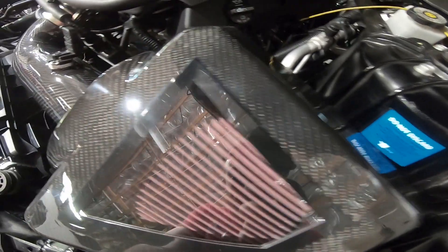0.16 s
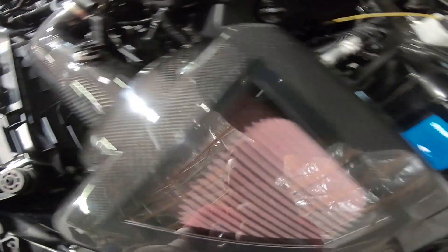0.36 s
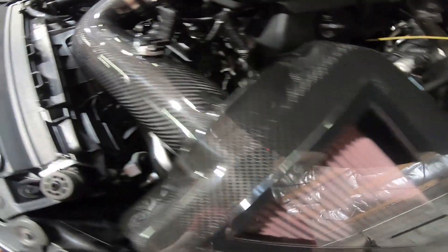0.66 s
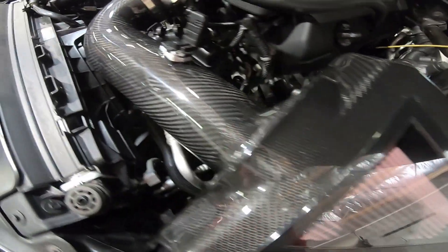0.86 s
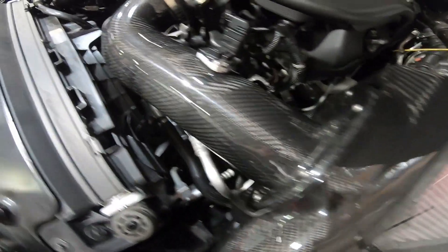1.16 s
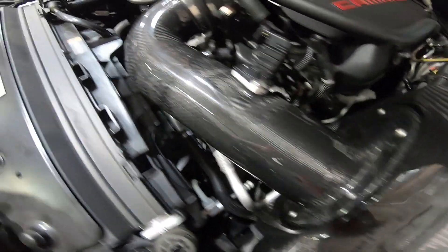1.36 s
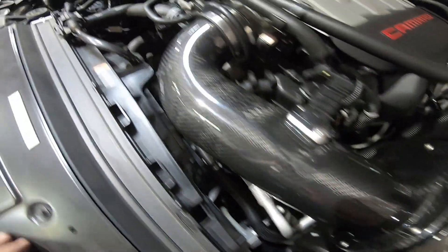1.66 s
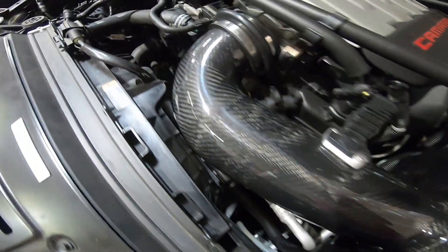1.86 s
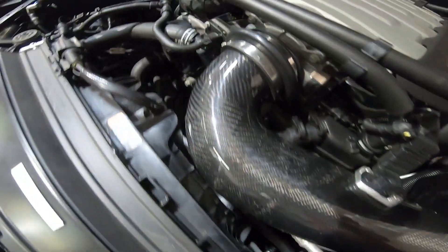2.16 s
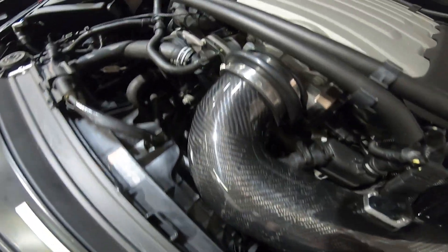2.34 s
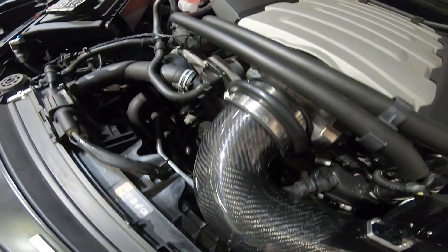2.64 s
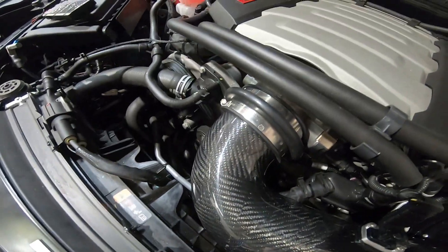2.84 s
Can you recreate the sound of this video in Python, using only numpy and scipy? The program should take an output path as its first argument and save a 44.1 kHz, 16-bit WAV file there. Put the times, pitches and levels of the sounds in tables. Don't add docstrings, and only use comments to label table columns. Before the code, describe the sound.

A large eight-cylinder engine idles without revving, heard close over the open bay in a garage: deep steady drone, rough low rumble, hissing valve ticks and small repeating pings, with one soft handling knock early on.

```python
import sys
import numpy as np
from scipy import signal
from scipy.fft import rfft, irfft
from scipy.io import wavfile

SR = 44100
rng = np.random.default_rng(int(sys.argv[2]) if len(sys.argv) > 2 else 0)


def int16_out(signal):
    q = np.round(np.clip(np.atleast_2d(signal).T, -1, 1) * 32767)
    wavfile.write(sys.argv[1], SR, q.astype(np.int16))


def volts_from_db(level):
    exponent = np.asarray(level, float) / 20
    return 10 ** exponent


N = 132300

# (time [s], firing rate [Hz], drone level [dB])
FIRING = [(0.0, 39.49, -17.5), (0.375, 39.92, -17.9), (0.75, 39.84, -18.0), (1.125, 40.21, -18.0),
          (1.5, 40.08, -17.6), (1.875, 40.01, -16.7), (2.25, 40.28, -17.6), (2.625, 40.22, -18.2),
          (3.0, 40.46, -18.2)]
# (time [s], travel [0 = over air box, 1 = over engine], drone octave level [dB])
CAMERA = [(0, 0.13, -21), (.4, 0.15, -25), (.8, 0.45, -25), (1.2, 0.69, -23.5), (1.6, 0.83, -24.5),
          (1.9, 1, -24), (2.3, 1, -23.5), (2.6, 1, -25), (3, 1, -23.5)]


def evened(x):
    return x / np.sqrt(np.mean(x ** 2) + 1e-20)


def column(table, index):
    rows = np.array(table)
    return np.interp(np.arange(N) / SR, rows[:, 0], rows[:, index])


def read(table, hz, index=1):
    rows = np.array(table)
    return np.interp(np.log(hz + 1), np.log(rows[:, 0] + 1), rows[:, index])


def air(gain):
    hz = np.fft.rfftfreq(N, 1 / SR)
    return evened(irfft(rfft(rng.standard_normal((2, N))) * gain(hz), N))


def resonance(hz, mid_hz, width_hz):
    return 1 / (1 + (2 * (hz - mid_hz) / width_hz) ** 2)


def per_firing(turns):
    return np.interp(turns, np.arange(200), rng.standard_normal(200))


def drone(turns):
    # (time [s], pitch [Hz], level [dB])
    mains = [(0.0, 119.13, -27.5), (0.375, 120.14, -27.8), (0.75, 119.87, -27.5), (1.125, 119.92, -26.6),
             (1.5, 120.04, -26.7), (1.875, 119.91, -26.6), (2.25, 119.88, -24.7), (2.625, 120.04, -25.9),
             (3.0, 119.45, -27.1)]
    uneven_db, uneven_turns = .35, .006
    octave_turn, hum_turn = .13, -.32

    first_amp = volts_from_db(column(FIRING, index=2) + uneven_db * per_firing(turns))
    first_turns = turns + uneven_turns * per_firing(turns)
    first = first_amp * np.cos(2 * np.pi * first_turns)

    second_amp = volts_from_db(column(CAMERA, index=2) + 2 * uneven_db * per_firing(turns))
    second_turns = 2 * turns + octave_turn + 2 * uneven_turns * per_firing(turns)
    second = second_amp * np.cos(2 * np.pi * second_turns)

    hum_turns = np.cumsum(column(mains, index=1)) / SR + hum_turn
    hum = volts_from_db(column(mains, index=2)) * np.cos(2 * np.pi * hum_turns)
    return np.sqrt(2) * (first + second + hum)


def rumble(travel):
    # (frequency [Hz], density [dB per Hz])
    colour = [(15, -7), (50, -1), (100, 3.5), (140, -1.5), (175, -6), (260, -11.5), (400, -16), (600, -24)]
    level_db, travel_db = -28.5, -1
    noise = air(lambda hz: volts_from_db(read(colour, hz)) / (1 + (hz / 700) ** 4))
    return volts_from_db(level_db + travel_db * travel) * noise


def whirr(travel):
    # (frequency [Hz], density [dB per Hz])
    colour = [(300, -10.5), (450, -3), (800, -1), (1130, -7.5), (1740, -12.5), (3010, -15.5), (4670, -26),
              (7000, -49)]
    level_db, travel_db = -42, 3.5
    noise = air(lambda hz: volts_from_db(read(colour, hz)) * (hz > 200) * (hz < 9000))
    return volts_from_db(level_db + travel_db * travel) * noise


def pump_whine():
    # (time [s], swell [dB])
    swell = [(0, -6), (.55, -6), (.68, 11), (.85, -7), (1.0, 16.5), (1.25, 9), (1.4, -3), (2.2, 5),
             (3, 12.5)]
    mid_hz, width_hz, level_db = 2950, 10, -70
    return volts_from_db(level_db + column(swell, index=1)) * air(lambda hz: resonance(hz, mid_hz, width_hz))


def lumps(per_s):
    hz = np.fft.rfftfreq(N, 1 / SR)
    return evened(irfft(rfft(rng.standard_normal(N)) / (1 + (hz / per_s) ** 4) * (hz > .5), N))


def cavities(table, nearness, lump_db, lumps_per_s):
    out = np.zeros((2, N))
    for mid_hz, width_hz, db, nearness_db in table:
        level_db = db + nearness_db * nearness + lump_db * lumps(lumps_per_s)
        out += volts_from_db(level_db) * air(lambda hz: resonance(hz, mid_hz, width_hz))
    return out


def panels():
    # (frequency [Hz], width [Hz], level [dB], change from far to near [dB])
    booms = [(208.5, 30.5, -44.5, 11), (252, 38, -51, 10.5), (299, 26, -45, 8), (337, 54, -51, 4.5)]
    # (time [s], nearness [0 = far, 1 = near])
    nearness = [(0, .3), (.5, 0.12), (.85, 0.55), (1.15, 0.39), (1.4, 0.79), (1.65, 0.77), (1.9, 1.25),
                (2.1, 1.15), (2.35, 1.26), (2.5, 0.92), (2.6, 1.26), (2.72, 0.63), (3, 0.59)]
    return cavities(booms, column(nearness, index=1), lump_db=1.5, lumps_per_s=14)


def air_box(travel):
    # (frequency [Hz], width [Hz], level [dB], change over the travel [dB])
    hollows = [(491, 136, -39.5, -35), (621, 210, -50, -20.5), (1775, 230, -53, -1.5),
               (429.4, 24, -49, -1.5), (620, 22, -54, 4.5), (1011, 34, -63, 9.5), (1330, 95, -62, 2),
               (2170, 330, -60, 3.5)]
    return cavities(hollows, travel, lump_db=2, lumps_per_s=20)


def valves(turns, travel):
    # (frequency [Hz], density [dB per Hz])
    hiss = [(3000, -19), (4700, -9.5), (6200, -2), (7000, -2), (7900, -3.5), (8700, -12), (10800, -18.5),
            (15800, -25.5)]
    # (place [firings], level over steady hiss [dB])
    puffs = [(.55, -9.5), (1.52, 4.5), (2.5, -2), (3.5, 2.5), (3.85, -1), (4.55, 1), (5.55, 3), (6.52, 5),
             (7.45, 2.5)]
    # (from [Hz], to [Hz], share of the puffs [0-1])
    gear = [(2000, 5200, .6), (5200, 6000, .9), (6000, 6700, 1), (6700, 7400, .9), (7400, 8300, 1),
            (8300, 9400, .6), (9400, 11000, .6), (11000, 17000, .4)]
    hiss_db, travel_db = -51, 3
    rise_firings, fall_firings, spread_db = .1, .3, 3.2
    ticks_per_s, tick_db, tick_spread_db = 360, -14, 1

    share = np.clip(np.array(gear)[:, 2:], 0, 2)
    power = np.ones((len(gear), N))
    for place, db in puffs:
        since = (turns - place) % 8
        cycle = ((turns - place) // 8 + 1).astype(int)
        shape = (1 - np.exp(-since / rise_firings)) * np.exp(-since / fall_firings)
        luck = np.sqrt(3) * rng.uniform(-0.91, 1, (len(gear), 20))
        size = share * volts_from_db(2 * (db + spread_db * luck))
        power += 2 * shape * size[:, cycle]

    tick_size = volts_from_db(tick_spread_db * np.minimum(rng.exponential(1, N), 4))
    ticks = (rng.random(N) < ticks_per_s / SR) * tick_size
    drive = rng.standard_normal((2, N)) + volts_from_db(tick_db) * evened(ticks - ticks.mean())

    hz = np.fft.rfftfreq(N, 1 / SR)
    spectrum = 0
    for part_power, (lo_hz, hi_hz, _) in zip(power, gear):
        spectrum = spectrum + rfft(drive * np.sqrt(part_power)) * (hz >= lo_hz) * (hz < hi_hz)
    return volts_from_db(hiss_db + travel_db * travel) * evened(irfft(spectrum * volts_from_db(read(hiss, hz)), N))


def pings(turns, travel):
    # (place [firings], frequency [Hz], t60 [s], level [dB], change over the travel [dB])
    parts = [
        (.75, 782, .12, -32.5, 0),
        (7.3, 662, .17, -27, -24),
        (4.7, 775, .09, -42, 0),
        (6.1, 615, .14, -32, -22),
        (4.4, 530, .09, -32, -18),
        (3.2, 735, .09, -46, 8),
    ]
    # (time [s], level [dB])
    facing = [(0, -3.5), (.25, -3), (.45, 0), (.9, 0), (1.2, 2.5), (2.1, 1.5), (2.3, -1.5), (2.65, -4),
              (2.85, 0), (3, -1)]
    rise_s, spread_db = .007, .8

    t = np.arange(SR // 4) / SR
    out = np.zeros(N)
    for place, hz, t60_s, db, travel_db in parts:
        cycle = ((turns - place) // 8 + 1).astype(int)
        struck = np.diff(cycle, prepend=cycle[0]) > 0
        luck_db = spread_db * rng.standard_normal(20)[cycle]
        blows = struck * volts_from_db(db + travel_db * travel + column(facing, index=1) + luck_db)
        ring = (1 - np.exp(-t / rise_s)) * volts_from_db(-60 * t / t60_s) * np.sin(2 * np.pi * hz * t)
        out += signal.oaconvolve(blows, 2 * ring)[:N]
    return out


def bump():
    start_s, hz, t60_s, level_db, rise_s = .895, 170, .12, -22, .008
    t = np.maximum(np.arange(N) / SR - start_s, 0)
    envelope = volts_from_db(level_db - 60 * t / t60_s) * (1 - np.exp(-t / rise_s))
    knock = envelope * np.sin(2 * np.pi * hz * t)
    return np.array([knock, -knock])


def ports(direct, diffuse):
    # (frequency [Hz], likeness [0-1], left minus right [dB], left lead [rad])
    pair = [(40, 1, -.8, -.07), (120, .997, -1.3, -.07), (250, .995, -3, 0), (520, .87, -8.5, .7),
            (750, .82, -8, 1.5), (1100, .68, -1, 1.6), (1700, .64, .3, .9), (2800, .62, 0, .4),
            (4500, .7, -2.5, .1), (6000, .4, -.5, 0), (8100, .45, 1, 0), (13000, .35, 0, 0)]
    hz = np.fft.rfftfreq(2 * N, 1 / SR)
    same = np.clip(read(pair, hz), 0, 1)
    a, b = rfft(diffuse, 2 * N)
    d = rfft(np.concatenate([direct, direct[::-1]]))
    tilt = volts_from_db(read(pair, hz, index=2) / 2) * np.exp(.5j * read(pair, hz, index=3))
    left = (d + a) * tilt
    right = (d + same * a + np.sqrt(1 - same ** 2) * b) / tilt
    return irfft(np.array([left, right]), 2 * N)[:, :N]


def narrowed(x):
    wide_hz, band_hz, wide_share, wide_share_top = 6200, 600, .35, .14
    dip_db = -3
    mid_side = np.array([x[0] + x[1], x[0] - x[1]]) / 2
    hz, t, (mid, side) = signal.stft(mid_side, SR, nperseg=2048, noverlap=1536)
    band = np.maximum((hz - wide_hz) // band_hz + 1, 0).astype(int)
    luck = rng.random((len(t) // 4 + 1, band.max() + 1))
    luck = luck.repeat(4, 0)[:len(t)].T[band]
    share = np.where(band == 0, 1, np.where(band < 5, wide_share, wide_share_top))[:, None]
    wide = luck < share
    dip = volts_from_db(-dip_db * np.log(np.clip(luck / share, .01, 1)) * (band > 0)[:, None])
    patched = np.array([mid * dip, side * wide])
    mid, side = signal.istft(patched, SR, nperseg=2048, noverlap=1536)[1][:, :N]
    return np.array([mid + side, mid - side])


def scene():
    turns = np.cumsum(column(FIRING, index=1)) / SR + .01
    travel = column(CAMERA, index=1)
    direct = drone(turns) + pings(turns, travel)
    bay = rumble(travel) + whirr(travel) + pump_whine() + panels() + air_box(travel)
    return ports(direct, bay + valves(turns, travel)) + bump()


def top_cut(x):
    return signal.sosfilt(signal.butter(12, 15760, fs=SR, output="sos"), x)


def record(dry):
    ceiling, offset = .5, -.0027
    soft = dry / (1 + (dry / ceiling) ** 4) ** 0.28
    mix = narrowed(soft) + offset
    return top_cut(mix)


dry = scene()
out = record(dry)
int16_out(out)
```